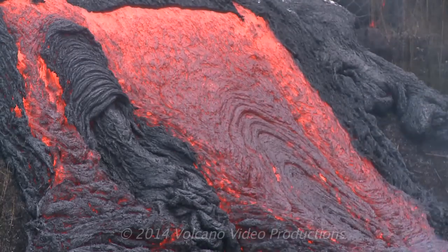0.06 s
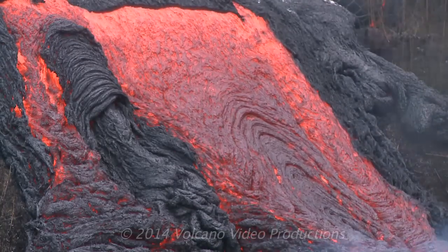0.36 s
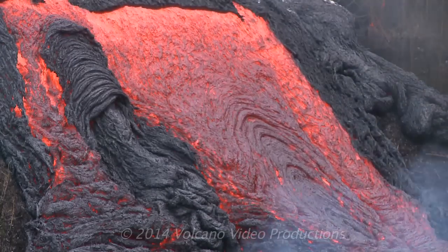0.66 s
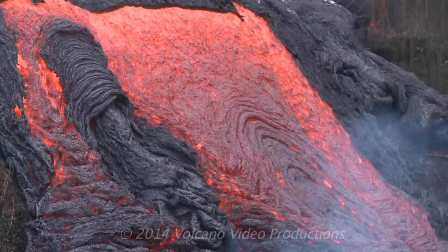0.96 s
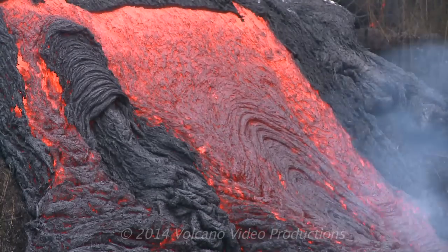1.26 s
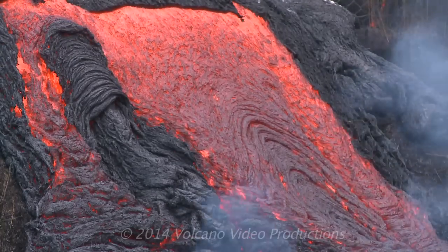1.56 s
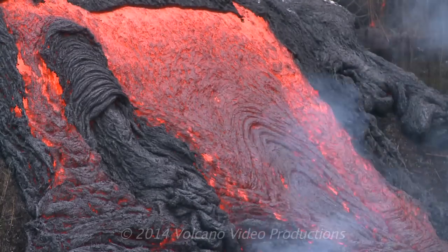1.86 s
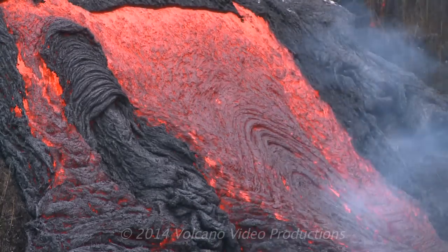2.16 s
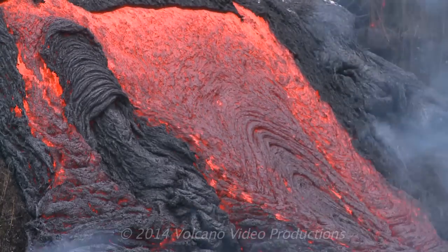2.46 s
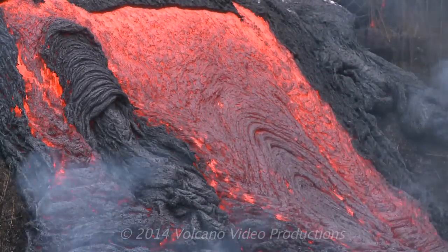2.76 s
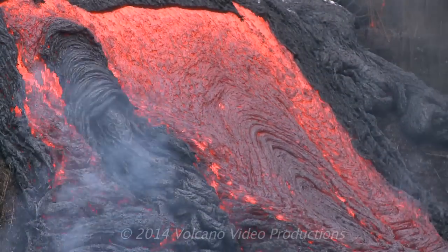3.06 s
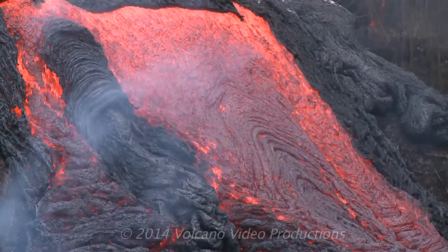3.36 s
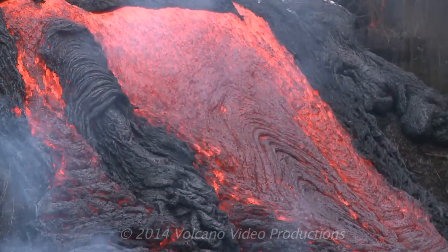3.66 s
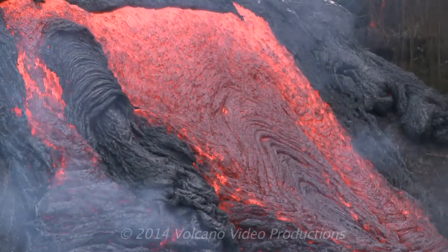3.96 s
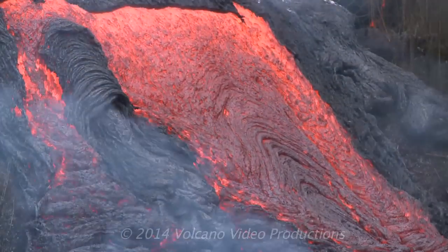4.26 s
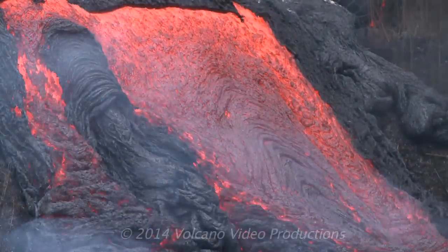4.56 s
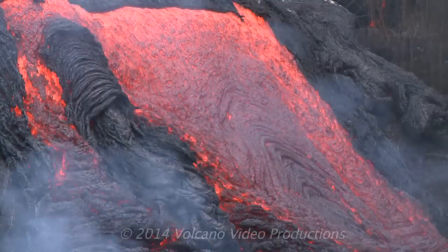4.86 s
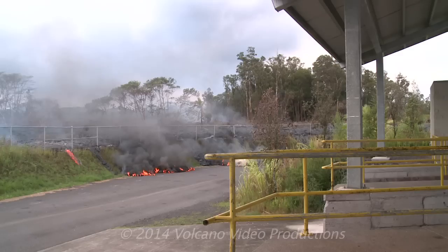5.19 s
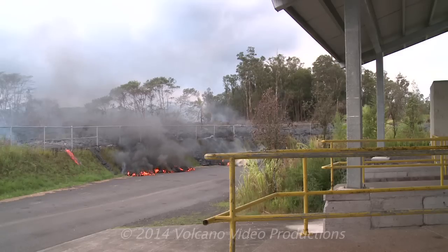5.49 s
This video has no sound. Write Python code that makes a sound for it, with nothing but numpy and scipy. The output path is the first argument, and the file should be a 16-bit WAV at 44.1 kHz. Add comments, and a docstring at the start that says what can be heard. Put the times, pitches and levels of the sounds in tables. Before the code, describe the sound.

Close, dry snaps and pops come unevenly from the skin of a slow lava flow, over a bed of fine crackle and escaping gas hiss. Low wind buffets the microphone throughout, and glassy flakes occasionally tinkle. Near the end everything stops abruptly, leaving soft open-air ambience, a faint trilling insect and a single tick.

```python
"""A lava flow creeps past outdoors: its glassy skin cracks and gas pockets pop, each snap a pressure
pulse doubled by its bounce off the ground. Countless small pops merge into a crackling bed, gas hisses
out, patches of crust crumble and glassy flakes tinkle. Underneath, wind rumbles on the microphone.
Near the end the scene cuts to a quiet roadside, where an insect trills with its wings."""
import sys
import numpy as np
from scipy import signal
from scipy.fft import rfft, irfft
from scipy.io import wavfile
from scipy.ndimage import uniform_filter1d

SR = 44100
rng = np.random.default_rng(int(sys.argv[2]) if len(sys.argv) > 2 else 0)


def dump(signal):
    """Clip the signal to [-1, 1] and save it as 16-bit WAV at the path in sys.argv[1]."""
    limited = np.clip(np.atleast_2d(signal).T, -1, 1)
    pcm = np.round(limited * 32767).astype(np.int16)
    wavfile.write(sys.argv[1], SR, pcm)


N = 243873
TIME = np.arange(N) / SR

# tone colours of the noise beds: (frequency [Hz], relative level [dB])
ROADSIDE_COLOUR = [(12, -11), (33, -2.5), (60, -8.5), (120, -11), (250, -15.5), (380, -15), (600, -19),
                   (2600, -27.5), (5200, -31), (9000, -38), (16000, -44)]
WIND_COLOUR = [(10, -8.5), (22, 1), (50, 1), (75, -5.5), (110, -11.5), (170, -21), (300, -37.5), (700, -54),
               (2000, -76)]
GAS_COLOUR = [(500, -48), (2500, 2), (4500, 3), (7000, -3), (10500, -11), (13500, -12.5), (16000, -18)]
DISTANT_POPS_COLOUR = [(60, 2.5), (200, 8), (400, 1), (800, -1), (1100, -4.5), (1600, -0.5), (2600, -4.5),
                       (4500, -19.5), (9000, -20), (16000, -47)]
# buffets of wind that thump the microphone: (time [s], length [s], level at the crest [dB])
WIND_BUFFETS = [(0.022, 0.12, -45), (0.126, 0.046, -43), (0.361, 0.068, -39), (0.562, 0.033, -37),
                (0.643, .04, -40), (0.823, .03, -38.5), (0.874, 0.048, -36.5), (1.06, .07, -42.5),
                (1.164, 0.051, -35.5), (1.253, .05, -42), (1.506, 0.046, -42.5), (1.813, 0.052, -42.5),
                (1.927, 0.081, -43), (2.025, 0.031, -39), (2.342, 0.044, -37.5), (2.405, 0.019, -37),
                (2.508, 0.074, -40.5), (2.605, 0.036, -42), (2.745, 0.057, -40), (2.847, 0.028, -43.5),
                (2.992, 0.052, -40.5), (3.213, 0.095, -36.5), (3.433, 0.054, -41.5), (3.528, 0.048, -38),
                (3.583, 0.027, -34), (3.657, 0.028, -38), (3.734, 0.064, -42.5), (3.818, .05, -39.5),
                (4.082, 0.022, -39.5), (4.304, 0.025, -38), (4.384, .05, -40.5), (4.733, 0.041, -40),
                (4.867, 0.071, -48.5), (5.032, 0.052, -39.5), (5.158, .04, -43)]
# fader rides for the escaping gas and the crackling crust: (time [s], level [dB])
GAS_FADER = [(0.0, -59.5), (1.07, -60), (1.57, -56), (1.97, -58.5), (3.36, -58), (3.91, -58.5),
             (4.51, -57.5), (5.01, -59), (5.05, -56)]
CRACKLE_FADER = [(0.0, -53.5), (0.15, -56), (0.87, -57), (1.5, -56), (1.64, -56), (2.71, -55.5),
                 (2.84, -56.5), (3.07, -56.5), (3.35, -55), (3.81, -56), (4.3, -56), (4.74, -54.5),
                 (4.84, -53.5), (5.05, -54)]
# ringing modes of one glassy shard: (pitch [Hz], relative level [dB], 60 dB decay time [s])
SHARD_MODES = [(4400, -3, .12), (5050, -5, .1), (5600, 0, 0.076), (7080, -5, 0.1), (7400, -6, .07),
               (9500, -11, .06), (10440, -6, .06), (11500, -3, .06)]
# touches that set the shard tinkling: (time [s], level [dB], favoured pitch [Hz])
SHARD_TOUCHES = [(.122, -48, 7800), (.158, -50, 7800), (.736, -48, 4600)]
# pings of glassy flakes: (time [s], peak level [dB], pitch [Hz], 60 dB decay time [s])
FLAKE_PINGS = [(0.31, -38, 6300, 0.018), (2.476, -24.5, 9700, 0.012), (2.4754, -39, 2730, .009),
               (4.7949, -28.5, 2500, 0.015)]
# patches of crust that crumble: (start [s], length [s], level [dB], centre pitch [Hz])
CRUMBLES = [(0.629, 0.064, -54.5, 3130), (1.287, 0.058, -51.5, 2560), (1.553, 0.07, -56, 6000),
            (1.68, 0.042, -54, 6800), (2.039, 0.072, -59, 2070), (2.4746, 0.0065, -43, 5900),
            (4.8, 0.065, -67, 2090), (4.918, 0.097, -62.5, 1700)]
# a pop's scatter off the rock; low pops come from folds, which scatter more: (pitch [Hz], level [dB])
ROCK_SCATTER = [(350, -13), (800, -9), (1800, -7), (2700, -22.5), (10000, -10)]
# foreground pops; small cracks are high, gas pockets low:
# (time [s], gain [dB], pitch [Hz], ground bounce delay [ms], hollowness [Q])
NEAR_POPS = [(0.037, -4, 430, 1.52, 0.7), (0.1121, -3.5, 1420, 1.12, 2.2), (0.2048, -18, 2490, 0.28, 0.5),
             (0.2837, -14, 1440, 0.18, 0.33), (0.4295, -25, 9100, 0.8, 0.67), (0.4613, -13, 925, 1.27, 1.6),
             (0.5737, -3.5, 372, 0.18, 0.64), (0.6495, -10.5, 2020, 0.23, 0.66),
             (0.6812, -21, 3250, 0.78, 0.5), (0.729, -27, 4270, 0.49, 0.3), (0.7965, -19, 3540, 0.2, 1.8),
             (0.912, -21, 2590, 0.43, 0.34), (0.9122, -28, 14500, 0.18, 1.1),
             (0.9595, -16, 1430, 0.74, 0.87), (0.9843, -16.5, 1920, 0.55, 0.33),
             (1.0125, -13, 1320, 0.3, 0.21), (1.0432, -16.5, 3430, 0.297, 0.42),
             (1.0742, -16, 3050, 0.46, 0.82), (1.0964, -10.5, 1460, 0.52, 0.88),
             (1.1691, -12.5, 1950, 0.56, 1.4), (1.2739, -15, 990, 1.3, 0.38),
             (1.3027, -10, 2280, 0.57, 0.85), (1.3168, -13.5, 1700, 0.84, 0.58),
             (1.323, -27, 5200, 0.9, 0.4), (1.396, -14, 2490, 0.26, 1.2), (1.44, -22, 4280, 0.77, 0.36),
             (1.462, -10, 1300, 0.8, 0.99), (1.6193, 4, 3930, 1.01, 0.6), (1.6552, 2.2, 2920, 0.99, 0.49),
             (1.6828, -23, 6500, 0.8, 0.5), (1.694, -14.5, 2400, 0.57, 0.6),
             (1.7116, -0.5, 383, 0.75, 0.63), (1.7333, -10.5, 6020, 0.87, 0.41),
             (1.838, -21, 4860, 0.86, 0.3), (1.8669, -3.5, 4400, 1.12, 0.37),
             (1.9492, -28, 3480, 1.1, 0.19), (2.0059, -13, 905, 1.43, 0.88),
             (2.0454, -11.5, 1240, 0.44, 0.86), (2.067, -12, 1870, 0.45, 1.5),
             (2.32, -27.5, 3480, 0.62, 0.29), (2.4764, -5, 4630, 1.1, 0.46),
             (2.5019, -12, 1400, 0.71, 0.36), (2.553, -14.5, 1400, 1.4, 0.42),
             (2.642, -30, 7040, 0.34, 0.41), (2.6746, -9, 430, 0.6, 0.65), (2.7073, -19, 1540, 1.5, 0.57),
             (2.7304, -14.5, 1540, 1.1, 0.75), (2.7515, -13, 4020, 0.22, 0.52),
             (2.7694, -10, 2240, 0.25, 1.6), (2.797, -21.5, 4200, 0.17, 0.3),
             (2.8002, -11.5, 1480, 0.65, 1.3), (2.8656, -14.5, 1500, 0.58, 0.56),
             (2.866, -5.5, 410, 0.45, 1.5), (2.869, -18.5, 1700, 0.84, 0.8), (3.014, -18, 8590, 0.2, 1.9),
             (3.102, -7, 320, 0.5, 1.2), (3.1362, -24, 6650, 0.82, 1.0), (3.1688, -15.5, 1310, 0.55, 0.8),
             (3.1835, -26, 5730, 0.67, 0.6), (3.2064, -13, 2880, 0.2, 1.2), (3.246, -11, 854, 1.47, 0.67),
             (3.2464, -24.5, 6000, 0.21, 0.3), (3.2676, -10, 700, 1.1, 1.0), (3.294, -7.5, 1600, 1.1, 2.5),
             (3.3132, -10, 1800, 1.2, 1.5), (3.324, -21, 5860, 1.1, 0.7), (3.3646, -10, 740, 1.28, 0.72),
             (3.4047, -7.5, 1650, 0.51, 1.9), (3.4415, -9, 1430, 0.5, 0.7), (3.442, -30, 10000, 0.41, 0.5),
             (3.4645, -12.5, 2520, 1.2, 0.39), (3.552, -14, 4770, 0.83, 0.34),
             (3.6207, -13.5, 4470, 0.8, 0.16), (3.623, -15, 850, 1.3, 1.2), (3.714, -11, 5100, 0.23, 0.57),
             (3.743, -4.5, 600, 0.28, 0.97), (3.7433, -9, 2220, 0.11, 1.1), (3.8993, -16, 3600, 0.82, 0.26),
             (3.9711, -10.5, 2060, 0.92, 0.49), (3.971, -16, 7000, 0.6, 0.24),
             (4.2549, -24.5, 5610, 1.16, 1.0), (4.281, -25, 3160, 0.93, 0.23),
             (4.3022, -8, 1080, 0.98, 2.2), (4.3665, -12.5, 5140, 0.86, 0.26),
             (4.4065, -14.5, 4320, 1.02, 0.21), (4.4459, -19.5, 3300, 0.95, 0.19),
             (4.5783, -6.5, 3830, 0.88, 0.61), (4.5877, -16.5, 925, 0.49, 0.37),
             (4.684, -25.5, 7360, 0.84, 0.7), (4.703, -16, 1100, 0.8, 0.34), (4.752, -21, 5780, 1, 0.46),
             (4.779, -12, 1360, 0.99, 0.31), (4.7944, -11.5, 3270, 0.84, 0.21),
             (4.8106, -16, 2100, 0.42, 1.4), (4.8263, -13, 1650, 1.4, 1.3), (4.847, -9, 1810, 1.34, 2),
             (4.8808, -12, 1050, 1.2, 0.33), (4.938, -18.5, 2050, 0.54, 1.5),
             (4.954, -16, 1400, 1.05, 0.99), (4.983, -21.5, 5480, 0.92, 0.18),
             (5.0022, -12, 895, 1.4, 0.57), (5.0224, -32, 17360, 0.44, 0.58),
             (5.108, -22.5, 3460, 0.93, 0.34), (5.1589, -15.5, 1620, 0.7, 0.96)]
# microphone EQ, with a soft treble dip and a roll-off on top: (frequency [Hz], gain [dB])
MICROPHONE_EQ = [(3000, -0.5), (5200, -3), (7500, -1.5), (9800, -1), (11500, -1), (14000, -3.5),
                 (16000, -7)]


def gain_of(db):
    """Decibels to amplitude."""
    return 10 ** (np.asarray(db) / 20)


def unit_rms(x):
    """Scales to rms 1."""
    return x / np.sqrt(np.mean(x ** 2) + 1e-20)


def gain_at(curve, hz):
    """An EQ curve's gain at hz, read along a log-frequency axis."""
    freqs, db = np.transpose(curve)
    return gain_of(np.interp(np.log(hz + 1), np.log(freqs + 1), db))


def fader(curve):
    """A fader ride as a gain for every sample."""
    return gain_of(np.interp(TIME, *np.transpose(curve)))


def add(mix, start_s, sound):
    """Drops a sound into the mix at start_s."""
    part = mix[max(round(start_s * SR), 0):][:len(sound)]
    part += sound[:len(part)]


def equalise(x, curve):
    """Colours a sound with an EQ curve."""
    return irfft(rfft(x) * gain_at(curve, np.fft.rfftfreq(N, 1 / SR)), N)


def noise(colour):
    """A steady bed of coloured noise, rms 1."""
    return unit_rms(equalise(rng.standard_normal(N), colour))


def patchy(x, depth_db, bands=10, frames=5):
    """Lets patches of the spectrum, some tens of ms long, swell and fade at random; rms 1."""
    spectrogram = signal.stft(x, nperseg=512)[2]
    patches = uniform_filter1d(rng.standard_normal(spectrogram.shape), bands, axis=0)
    patches = unit_rms(uniform_filter1d(patches, frames, axis=1))
    return unit_rms(signal.istft(spectrogram * gain_of(depth_db * patches))[1][:N])


def pop(hz, bounce_ms, hollow_q, splinter, ground_gain=0.63, steepness=1.72, rounding=2.57,
        splinter_s=0.0014, scatter_s=0.0065, size=2048):
    """One pressure pulse, its ground bounce, a spray of splinters and faint scatter from rough rock."""
    f, t = np.fft.rfftfreq(size, 1 / SR), np.arange(size) / SR
    u = 1j * f / hz
    # a dry crack lasts one cycle, a hollow pocket a few
    resonance = (u / (u + hollow_q * (1 + u ** 2))) ** steepness
    # a larger pocket opens more slowly and sounds rounder
    opening = 1 + np.sqrt(2) * u / rounding + (u / rounding) ** 2
    spray = rng.standard_normal(size) * np.exp(-t / splinter_s)
    scatter = rng.standard_normal(size) * np.exp(-t / scatter_s)
    tail = splinter * spray / np.linalg.norm(spray)
    tail += gain_at(ROCK_SCATTER, hz) * scatter / np.linalg.norm(scatter)
    bounce = ground_gain * np.exp(-2j * np.pi * f * bounce_ms / 1000)
    return irfft(resonance / opening * (1 + bounce + rfft(tail)))


def small_pop(hz, splinter):
    """A pop of random bounce delay and hollowness, rms 1."""
    bounce_ms, hollow_q = rng.uniform(0.312, 1.329), rng.uniform(0.38, 0.84)
    return unit_rms(pop(hz, bounce_ms, hollow_q, splinter))


def pop_swarm(per_s, low_hz, high_hz, spread_db, splinter, voices=48):
    """Many small pops at random moments, rms 1; most are faint, a few stand out."""
    out = np.zeros(N)
    for hz in np.geomspace(low_hz, high_hz, voices):
        accents = gain_of(spread_db * np.minimum(rng.exponential(1, N), 2.53))
        polarity = rng.choice([-1, 1], N)
        triggers = rng.random(N) < per_s / voices / SR
        out += signal.oaconvolve(triggers * accents * polarity, small_pop(hz, splinter))[:N]
    return unit_rms(out)


def insect(strokes_per_s=47.8, duty=0.65, pitch_hz=6220, sag_hz=520, rasp_hz=70, wet=0.4, echo_s=0.03):
    """A trill, rms 1: each wing stroke is a raspy tone that holds, then sags; brush echoes blur it."""
    cycle = ((TIME - 5.186) * strokes_per_s) % 1
    stroke = np.minimum(cycle / duty, 1)
    rasp = rasp_hz * unit_rms(uniform_filter1d(rng.standard_normal(N), size=40))
    tone = np.sin(2 * np.pi * np.cumsum(pitch_hz + rasp - sag_hz * stroke ** 3) / SR)
    trill = unit_rms(tone * np.sin(np.pi * stroke))
    brush = (rng.standard_normal(N) * np.exp(-TIME / echo_s))[:SR // 10]
    echoes = unit_rms(signal.oaconvolve(trill, brush)[:N])
    return unit_rms(trill + wet * echoes)


def roadside():
    """Quiet open-air ambience with the insect and one far tick."""
    out = gain_of(-58.5) * noise(ROADSIDE_COLOUR) + gain_of(-71.5) * insect()
    add(out, 5.444, gain_of(-39) * pop(hz=5470, bounce_ms=0.56, hollow_q=0.6, splinter=1.0))
    return out


def rumble(colour, evenness):
    """Turbulent air, rms 1; evenness from 0 to 1 compresses its chance lumps."""
    air = noise(colour)
    power = uniform_filter1d(abs(signal.hilbert(air)) ** 2, size=2200)
    return unit_rms(air / power ** (evenness / 2))


def wind(breeze_db=-48.5, buffet_pitch_ratio=0.94):
    """A lumpy breeze on the microphone, with slightly deeper buffets that swell and die away."""
    buffet_power = np.zeros(N)
    for time_s, length_s, db in WIND_BUFFETS:
        buffet_power += gain_of(db) ** 2 * np.exp(-(2 * (TIME - time_s) / length_s) ** 2)
    buffet_colour = [(hz * buffet_pitch_ratio, db) for hz, db in WIND_COLOUR]
    breeze = gain_of(breeze_db) * rumble(WIND_COLOUR, evenness=0.22)
    return breeze + np.sqrt(buffet_power) * rumble(buffet_colour, evenness=0.63)


def gas():
    """Hiss of escaping gas, with the fine ticking of the cooling skin."""
    ticks = pop_swarm(per_s=290, low_hz=3750, high_hz=10700, spread_db=5.5, splinter=0.88)
    hiss = patchy(noise(GAS_COLOUR), depth_db=1.9)
    return fader(GAS_FADER) * (gain_of(-6) * ticks + gain_of(-1.24) * hiss)


def blisters(per_s=70, low_hz=450, high_hz=2900, decay_cycles=2.2, spread_db=4, voices=30):
    """Small blisters burst and their hollows ring for a few cycles; rms 1."""
    out, t = np.zeros(N), np.arange(2048) / SR
    for hz in np.geomspace(low_hz, high_hz, voices):
        triggers = rng.random(N) < per_s / voices / SR
        accents = gain_of(spread_db * np.minimum(rng.exponential(1, N), 2.5))
        ring = np.sin(2 * np.pi * hz * t) * np.exp(-hz * t / decay_cycles)
        out += signal.oaconvolve(triggers * accents, ring)[:N]
    return unit_rms(out)


def crackling_crust():
    """Small pops and blisters over the wash into which the distant ones merge."""
    pops = pop_swarm(per_s=320, low_hz=1000, high_hz=3380, spread_db=7.5, splinter=0.37)
    crackle = gain_of(-1) * pops + gain_of(-10.5) * blisters()
    wash = patchy(noise(DISTANT_POPS_COLOUR), depth_db=1.5)
    return fader(CRACKLE_FADER) * (crackle + wash)


def shard(reach_octaves=0.53):
    """A glassy shard tinkles; each touch brings out the modes near its own pitch."""
    out, t = np.zeros(N), np.arange(SR // 6) / SR
    for time_s, db, touch_hz in SHARD_TOUCHES:
        for hz, mode_db, t60 in SHARD_MODES:
            share = 1 / (1 + (np.log2(hz / touch_hz) / reach_octaves) ** 2)
            envelope = share * gain_of(db + mode_db - 60 * t / t60)
            add(out, time_s, envelope * np.sin(2 * np.pi * hz * t))
    return out


def flakes():
    """Each glassy flake pings briefly in three close modes."""
    out, t = np.zeros(N), np.arange(SR // 10) / SR
    for time_s, db, hz, t60 in FLAKE_PINGS:
        modes_hz = hz * rng.uniform(0.93, 1.045, (3, 1))
        ring = np.sin(2 * np.pi * modes_hz * t).mean(0)
        add(out, time_s, gain_of(db - 60 * t / t60) * ring)
    return out


def crumbling_crust(per_s=600, spread_db=3):
    """Patches of crust give way in quick runs of tiny pops, each within an octave of the centre pitch."""
    out = np.zeros(N)
    for start_s, length_s, db, hz in CRUMBLES:
        count = max(round(per_s * length_s), 1)
        delays_s = rng.triangular(0, length_s / 2, length_s, count)
        octaves, accents = np.tanh(rng.standard_normal((2, count)))
        for delay_s, octave, accent in zip(delays_s, octaves, accents):
            grain = small_pop(hz * 2 ** octave, splinter=0.56)
            density_trim = np.sqrt(SR / per_s / len(grain))
            add(out, start_s + delay_s, gain_of(db + spread_db * accent) * density_trim * grain)
    return out


def near_pops():
    """Up front, single snaps of the cracking skin and pops of bursting gas pockets."""
    out = np.zeros(N)
    for time_s, db, hz, bounce_ms, hollow_q in NEAR_POPS:
        add(out, time_s, gain_of(db) * pop(hz, bounce_ms, hollow_q, splinter=0.4))
    return out


def scene(cut_s=5.179):
    """The lava in the wind, then a hard cut to the roadside; mono."""
    lava = near_pops() + crumbling_crust() + crackling_crust() + gas() + flakes() + shard() + wind()
    crossfade = uniform_filter1d(1. * (TIME > cut_s), size=200)
    return ((1 - crossfade) * lava + crossfade * roadside())[None]


def record(dry, cutoff_hz=16200):
    """The microphone's colour, then the recorder's steep high cut."""
    high_cut = signal.firwin(255, cutoff_hz, window=("kaiser", 9), fs=SR)
    return signal.oaconvolve(equalise(dry, MICROPHONE_EQ), high_cut[None], "same")


dry = scene()
out = record(dry)
dump(out)
```